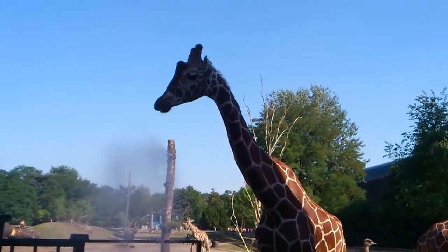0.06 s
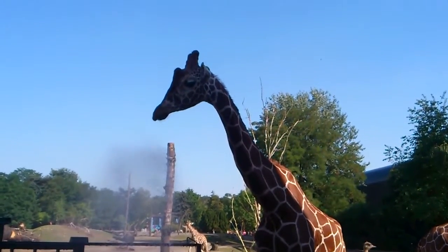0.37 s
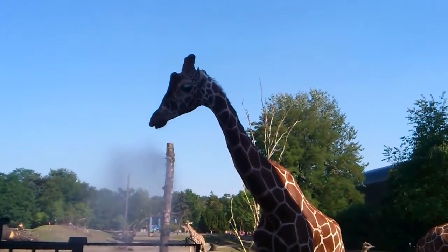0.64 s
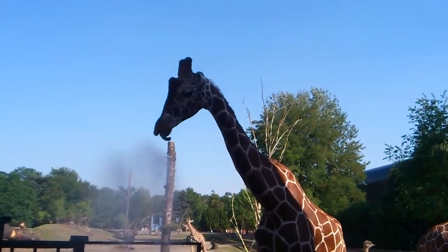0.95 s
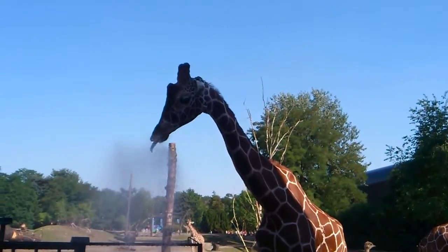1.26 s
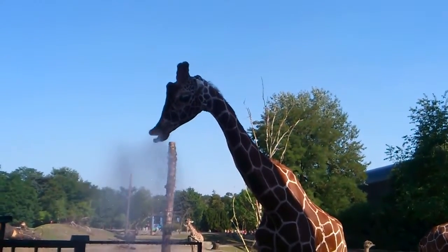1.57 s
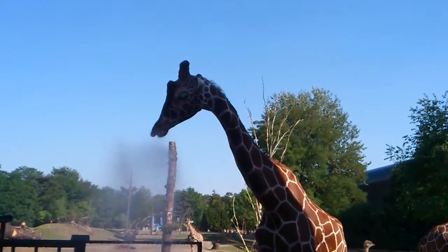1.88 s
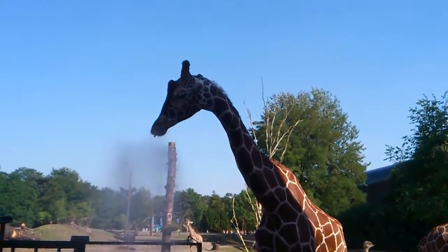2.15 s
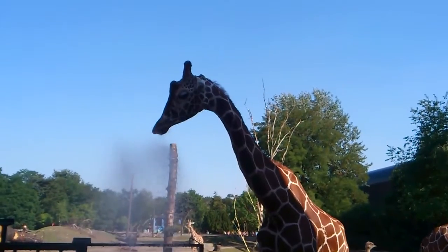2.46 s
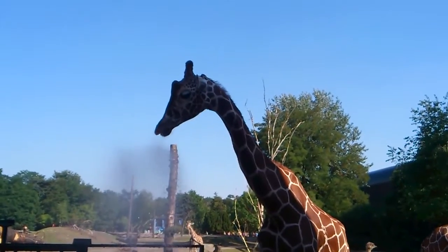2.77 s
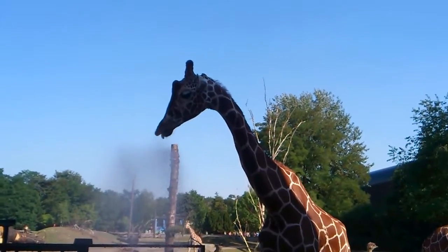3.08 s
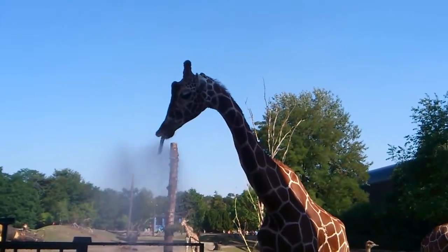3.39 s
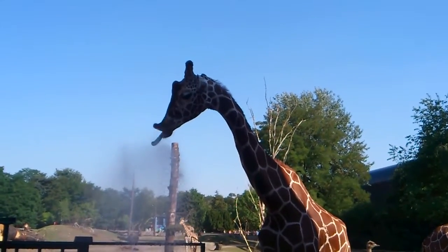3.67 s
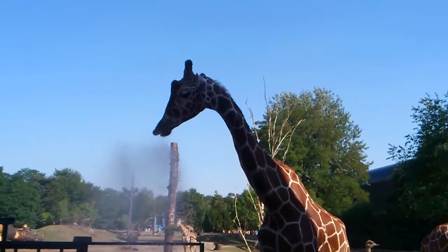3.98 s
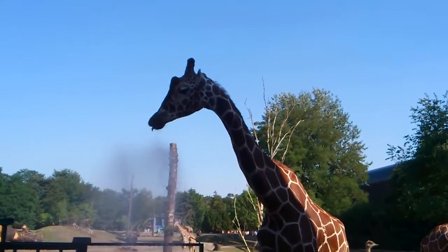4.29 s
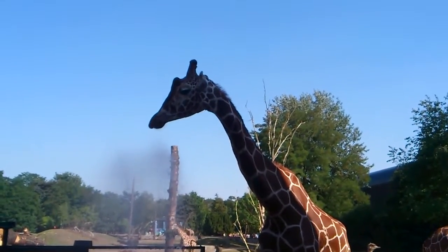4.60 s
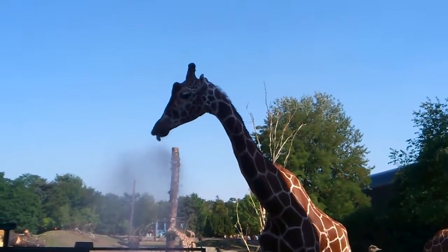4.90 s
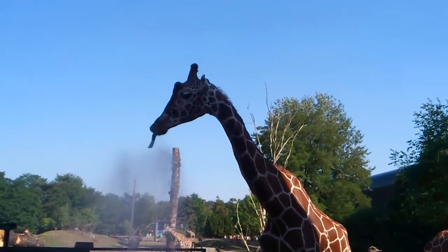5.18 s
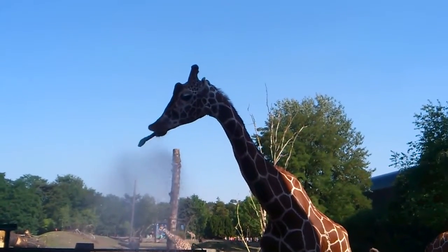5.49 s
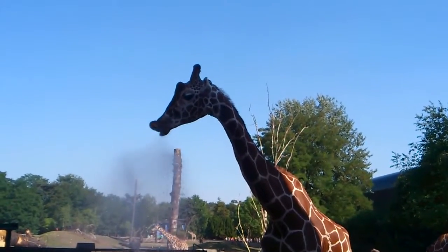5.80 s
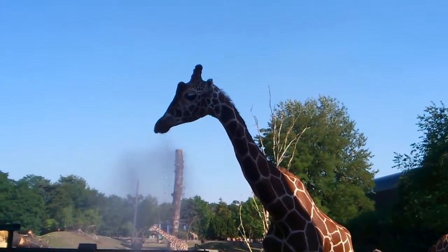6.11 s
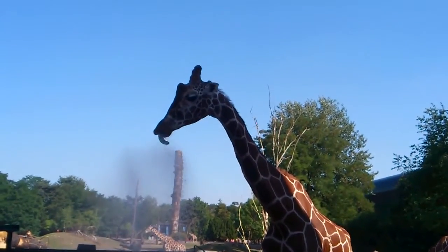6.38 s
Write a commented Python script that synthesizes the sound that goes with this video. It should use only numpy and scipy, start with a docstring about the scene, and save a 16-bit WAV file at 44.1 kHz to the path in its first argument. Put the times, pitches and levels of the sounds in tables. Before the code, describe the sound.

Water sprays from a mister in one constant, bright hiss, with a barely audible engine humming far away.

```python
"""From the start, a misting nozzle on a pole hisses steadily in an open animal enclosure, in mono.
Its jet tears into a fine spray, a bright noise coloured by fixed resonances and hollows.
Far below the hiss lie a faint outdoor rumble and the low idle of a distant engine.
About five seconds in, the engine swells briefly, then sinks away while the hiss carries on."""
import sys
import numpy as np
from scipy import signal
from scipy.fft import rfft, irfft, next_fast_len
from scipy.io import wavfile
from scipy.ndimage import uniform_filter1d

SR = 44100
rng = np.random.default_rng(int(sys.argv[2]) if len(sys.argv) > 2 else 0)


def waveform_to_disk(signal):
    """Save audio, clipped to [-1, 1], as 16-bit WAV at the path in sys.argv[1]."""
    frames = np.transpose(np.atleast_2d(signal))
    scaled = np.clip(frames, -1, 1) * 32767
    samples = np.round(scaled).astype(np.int16)
    wavfile.write(sys.argv[1], SR, samples)


N = 284445


def gain_of(db):
    """Decibels to amplitude."""
    return 10 ** (np.asarray(db) / 20)


def unit_rms(x):
    """Scales a signal to rms 1."""
    return x / np.sqrt(np.mean(x ** 2) + 1e-20)


def curve_at(points, hz):
    """Reads a curve of (Hz, value) points joined on a log-frequency axis."""
    point_hz, value = np.transpose(points)
    return np.interp(np.log(hz + 1), np.log(point_hz + 1), value)


def noise(colour_db):
    """Noise of rms 1 whose spectrum follows the function colour_db(Hz)."""
    size = next_fast_len(N)
    hz = np.fft.rfftfreq(size, 1 / SR)
    spectrum = rfft(rng.standard_normal(size)) * gain_of(colour_db(hz))
    return unit_rms(irfft(spectrum, size)[:N])


def wander(rate_hz):
    """Smooth random drift of rms 1, moving up to about rate_hz times a second."""
    return noise(lambda hz: -10 * np.log10(1 + (hz / rate_hz) ** 4))


# The tone of the outdoor bed. Each row: frequency in Hz, relative level in dB.
RUMBLE_SPECTRUM = [(10, -28), (22, -5), (42, -1), (60, -1.5), (80, -7), (105, -4.5), (190, -11),
                   (280, -11.5), (450, -22), (900, -50)]

def outdoor_rumble(level_db=-49):
    """An even, low bed of noise from the open air and far surroundings."""
    return gain_of(level_db) * noise(lambda hz: curve_at(RUMBLE_SPECTRUM, hz))


def distant_engine(note_hz=63, waver=.012, waver_hz=3, throb_db=1.0, idle_db=-62.5, swell_db=-48):
    """Only the wavering firing note of an engine carries this far; it swells once above its idle."""
    start_s, attack_s, hold_s, release_db_per_s = 4.9, .2, .35, 13
    since_s = np.arange(N) / SR - start_s
    attack = np.clip(since_s / attack_s, 0, 1)
    release_db = release_db_per_s * np.maximum(since_s - attack_s - hold_s, 0)
    envelope = np.hypot(gain_of(idle_db), attack * gain_of(swell_db - release_db))
    pitch_hz = note_hz * (1 + waver * wander(waver_hz))
    note = unit_rms(np.sin(2 * np.pi * np.cumsum(pitch_hz) / SR))
    throb = gain_of(throb_db * wander(waver_hz))
    return envelope * throb * note


def near_reflections(sound, echo_db=-17, first_s=.004, last_s=.012, count=16):
    """Faint reflections from things close by comb the sound with a fine, fixed ripple."""
    spread, polarity = rng.random((count, 2)).T
    delay_s = first_s + spread * (last_s - first_s)
    taps = np.zeros(SR // 20)
    taps[(SR * delay_s).astype(int)] = np.sign(polarity - .5)
    echoes = signal.oaconvolve(sound, taps / np.linalg.norm(taps))[:N]
    return unit_rms(sound + gain_of(echo_db) * echoes)


# The broad, bright tone of the water jet. Each row: frequency in Hz, relative level in dB.
JET_SPECTRUM = [(200, -19.0), (480, -17.8), (650, -14.0), (1100, -15.0), (1300, -11.0), (2000, -11.0),
                (3000, -7.0), (3800, -6.5), (4700, 0.0), (6200, -1.1), (7600, -2.4), (8200, -5.0),
                (12200, -10.3), (15700, -11.8)]
# Resonances and cancellations of the nozzle and the surfaces near it.
# Each row: centre in Hz, width in Hz, boost or cut in dB.
NOZZLE_RESONANCES = [(750, 45, -3.5), (1510, 135, 2.8), (1690, 190, -6.0), (2050, 90, -3.9),
                     (3350, 110, 5.7), (3960, 95, 3.4), (4160, 130, 3.7), (4710, 115, 2.2),
                     (5190, 110, 4.8), (5270, 105, -5.6), (5440, 110, 2.9), (5940, 60, -2.7),
                     (6220, 225, 3.6), (6560, 105, -3.7), (6780, 80, -3.7), (6880, 75, 3.2),
                     (7150, 85, -6.6), (7630, 190, 5.0), (7920, 100, -6.2), (8160, 65, 4.3),
                     (9240, 235, 3.9), (9800, 75, -4.5), (10350, 180, 10.7), (10530, 80, -3.7),
                     (11040, 240, 7.7), (12240, 520, 4.0), (12670, 75, 3.0), (13350, 85, 3.1),
                     (13950, 520, 3.5), (14770, 140, -3.5)]

def jet_hiss():
    """The jet tears into broadband noise, with a bell-shaped peak or hollow for each resonance."""
    def colour_db(hz):
        bells_db = sum(db * .5 ** ((2 * (hz - centre) / width) ** 2)
                       for centre, width, db in NOZZLE_RESONANCES)
        return curve_at(JET_SPECTRUM, hz) + bells_db
    return noise(colour_db)


def misting_nozzle(level_db=-24, flutter_db=0.7, flutter_hz=25, fizz_hz=9500):
    """Constant water pressure holds the body of the hiss still; the finest mist flutters a little."""
    hiss = near_reflections(jet_hiss())
    highpass = signal.butter(4, fizz_hz, btype="high", fs=SR, output="sos")
    fizz = signal.sosfilt(highpass, hiss)
    body = hiss - fizz
    flutter = gain_of(flutter_db * wander(flutter_hz))
    return gain_of(level_db) * (body + fizz * flutter)


def scene():
    """The hiss up front, rumble and engine far beneath it, the same in both channels."""
    mix = misting_nozzle() + outdoor_rumble() + distant_engine()
    return np.array([mix, mix])


def record(dry, levelling=.6, window_s=.01, cutoff_hz=15740):
    """A quick gain control partly irons out swells and dips; a steep low-pass trims the top."""
    power = uniform_filter1d((dry ** 2).mean(0), int(window_s * SR))
    swell_db = 10 * np.log10(power / power.mean())
    levelled = dry * gain_of(-levelling * swell_db)
    lowpass = signal.firwin(1023, cutoff_hz, window=("kaiser", 9), fs=SR)
    return signal.oaconvolve(levelled, lowpass[None], "same")


dry = scene()
out = record(dry)
waveform_to_disk(out)
```